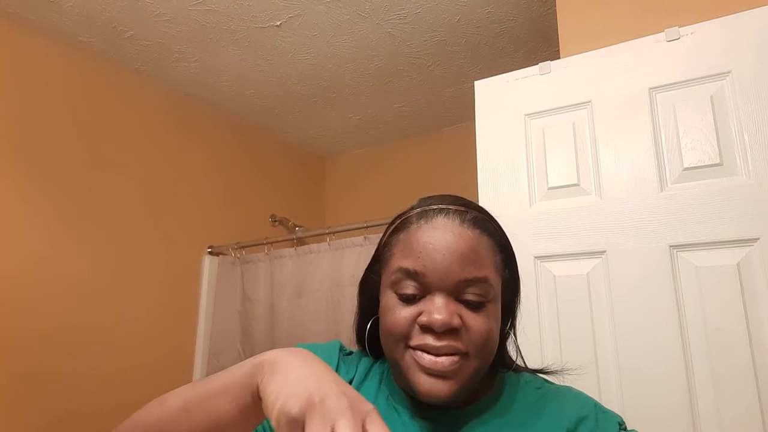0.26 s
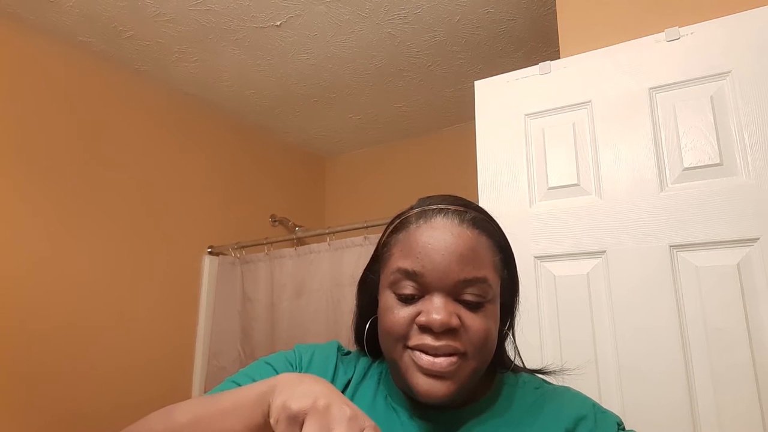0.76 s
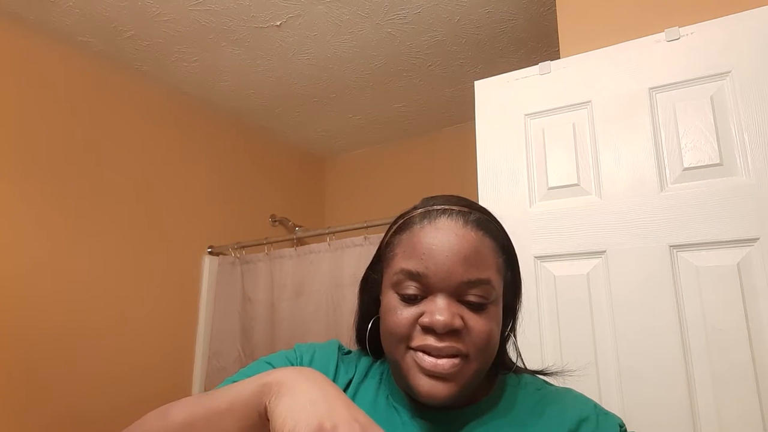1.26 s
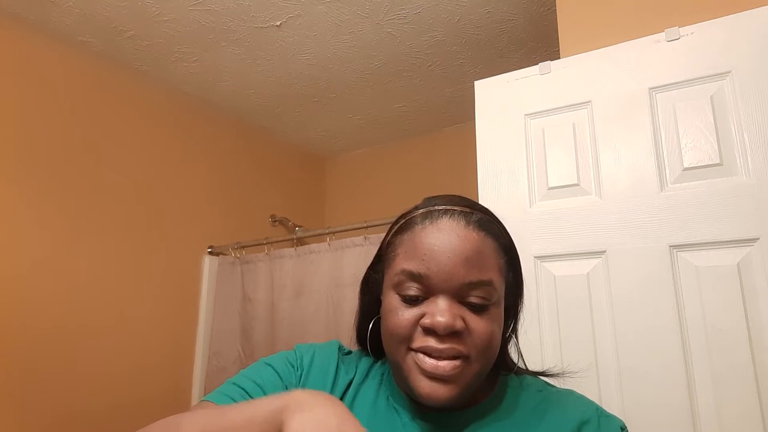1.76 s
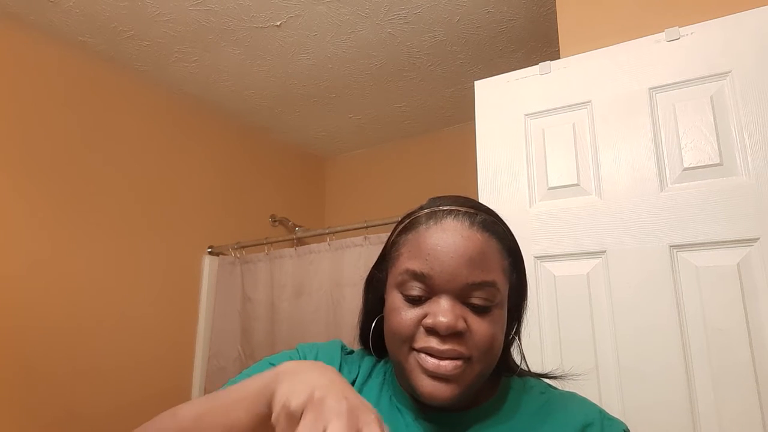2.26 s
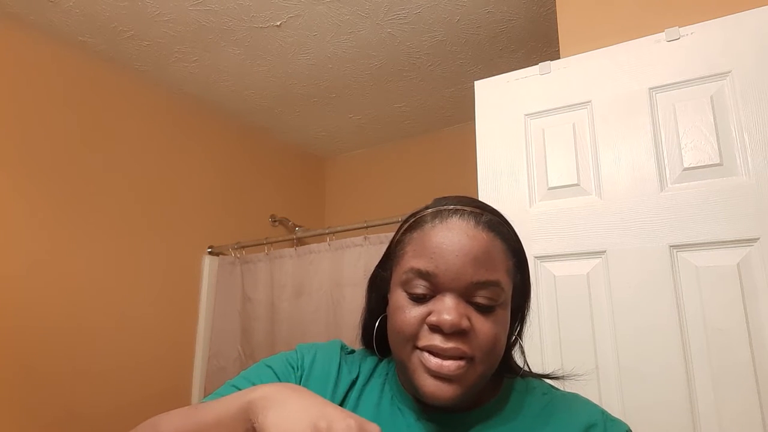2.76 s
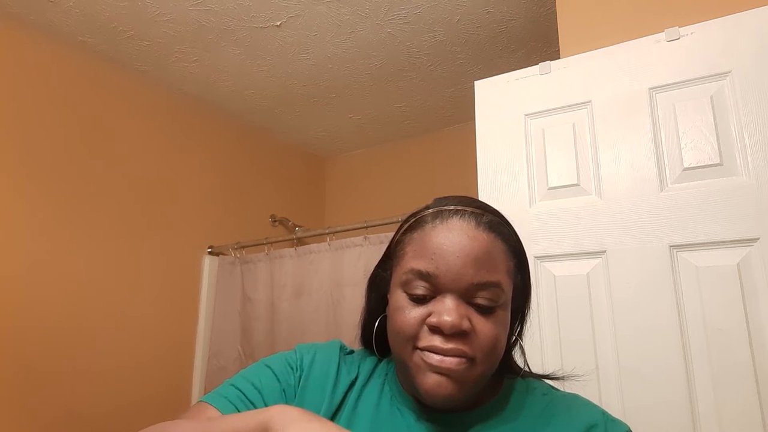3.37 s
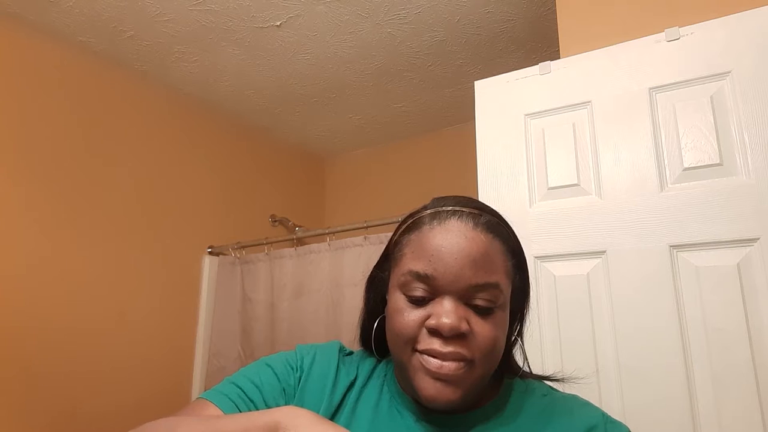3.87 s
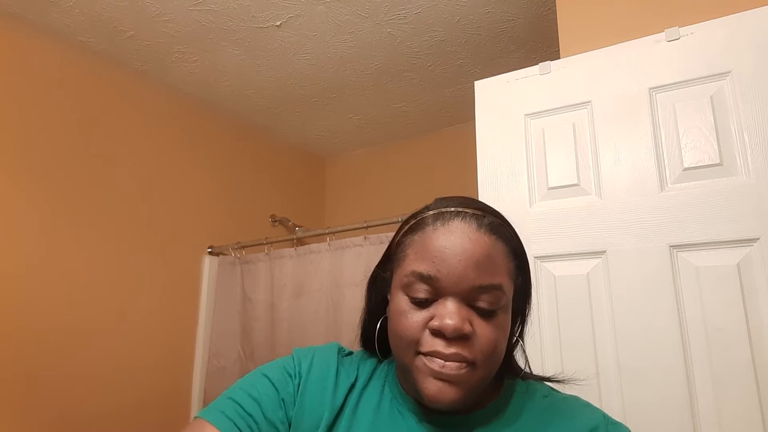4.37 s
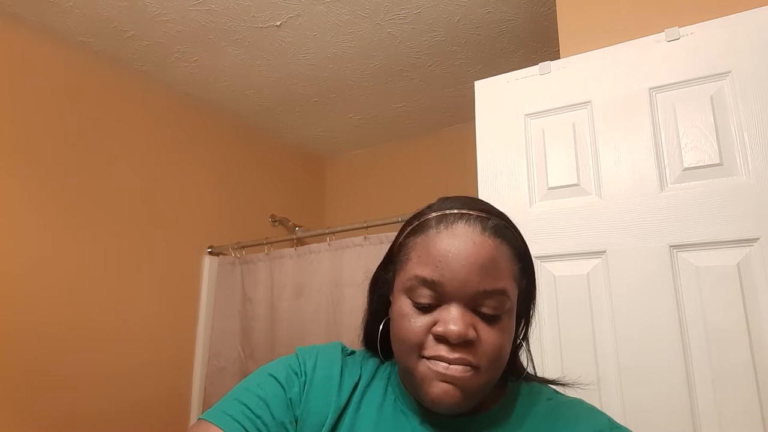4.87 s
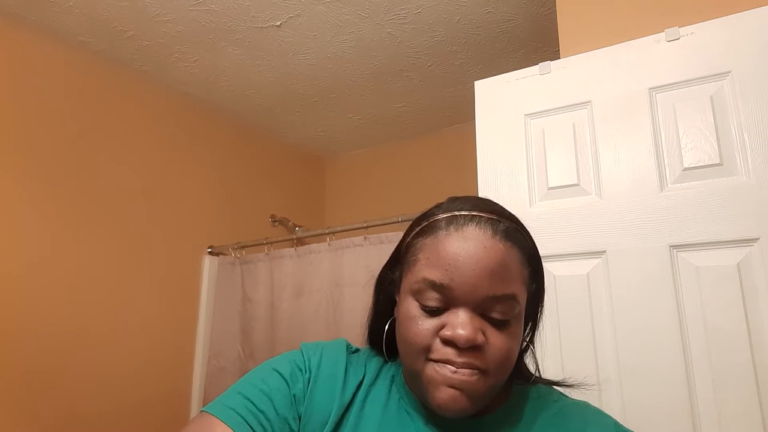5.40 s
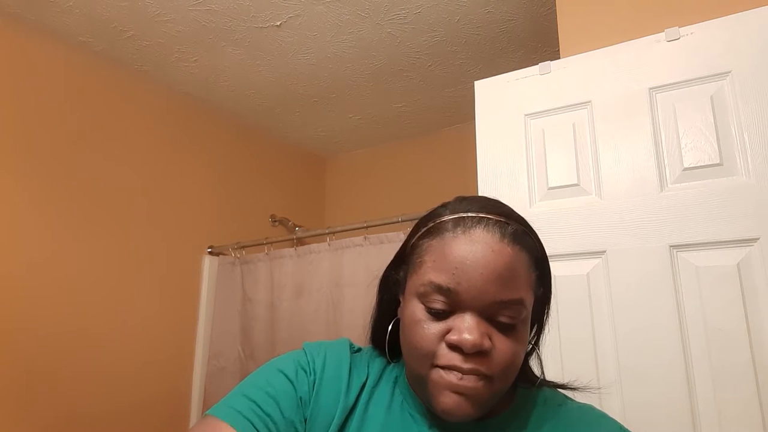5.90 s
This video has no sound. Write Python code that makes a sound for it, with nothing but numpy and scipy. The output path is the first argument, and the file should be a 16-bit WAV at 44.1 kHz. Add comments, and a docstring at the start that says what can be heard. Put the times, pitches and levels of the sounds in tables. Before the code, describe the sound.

A tight metal lid clicks and scrapes on a glass jar in a small bathroom, then the jar knocks down on the counter.

```python
"""A tight metal lid is twisted and forced on a glass jar in a small tiled bathroom.
The thread slips in clicks and short scrapes that ring the lid, fingers rub on it, and at last the
jar knocks down on the counter. Hard walls ring for about a third of a second over a bed of air,
rumble and wavering low hum, all heard close up by a phone with two microphone ports."""
import sys
import numpy as np
from scipy import signal
from scipy.fft import rfft, irfft, next_fast_len
from scipy.io import wavfile

SR = 44100
rng = np.random.default_rng(int(sys.argv[2]) if len(sys.argv) > 2 else 0)


def master_out(mix):
    """Clip the mix to full scale and print it as 16-bit PCM to the path in sys.argv[1]."""
    frames = np.transpose(np.atleast_2d(mix))
    ceiling = np.clip(frames, -1, 1)
    pcm = np.round(ceiling * 32767).astype(np.int16)
    wavfile.write(sys.argv[1], SR, pcm)


N = 270774

# Thread clicks; depth adds drive mostly to the body, twist to skirt and rim:
# start_s, edge_level_db, depth_db, twist_db
SLIPS = [(.007, -26, -25, 7), (0.0365, -10, -20, 2.5), (0.0931, -16.5, -16.5, -1.5), (.178, -30.5, -7.5, 2),
         (0.297, -65, -27, 4), (0.3621, -46, -16.5, -16), (0.6783, -44, -12, -5), (.765, -43.5, -14.5, -4),
         (0.9148, -29.5, -13, 1), (0.925, -13.5, -21.5, 0), (0.9335, 3, -25.5, -3.5),
         (0.9803, -9.5, -25, 0), (1.0678, -32, -20, 3), (1.075, -14.5, -21, 1), (1.1214, -27.5, -37, 3),
         (1.1337, -52, 2.5, 22), (1.205, -34, -16.5, 2.5), (1.3028, -78.5, 29, -5),
         (1.4487, -38.5, -14.5, -5), (1.463, -27, -12.5, 1), (1.6142, -33.5, -8, -1),
         (1.7512, -20, -15, -1.5), (1.847, -65, 18, 1), (1.98, -44.5, -12, -5), (2.0509, -26, -15, -1.5),
         (2.3675, -53, -22, -13), (2.4734, -45.5, -13, -5.5), (2.7189, -43.5, -1.5, 2),
         (3.1011, -33.5, -6.5, 3.5), (3.2266, -40.5, -9, -14), (3.4643, -26.5, -8, -3.5),
         (4.1067, -41, -8, -2.5), (4.139, -47, 22.5, -11), (4.1773, -21, -4, -19), (4.2026, -11.5, -7.5, 5),
         (4.248, -8, -7.5, 3), (4.285, -11, -13.5, 4), (4.4507, -29, -12, 6), (4.478, -52, 6, -6),
         (4.5344, -35.5, -19, 7), (4.6147, -13.5, -7.5, 7), (4.772, -46, 3.5, 0), (4.7923, -24, 0.5, 6),
         (4.875, -60, 27.5, -8), (5.1268, -43.5, 17, 0), (6.0334, -55.5, 9.5, 3.5)]
# Forced scrapes: start_s, hold_s, edge_level_db, depth_db
SCRAPES = [(.036, 0.02, -39.5, -18.5), (.936, 0.054, -35.5, -23), (1.07, 0.012, -48, -18),
           (1.125, 0.0083, -54.5, -16.5), (4.135, .03, -62.5, 6), (4.17, 0.033, -43.5, -9.5),
           (4.204, 0.037, -33.5, -13.5), (4.284, 0.0058, -36, -10), (5.108, 0.0069, -80.5, 27)]
# Finger rubs: start_s, hold_s, edge_level_db, depth_db
RUBS = [(.33, 0.3, -78.5, -24.5), (.6, 0.067, -75.5, -10), (.82, 0.068, -81, -28.5), (1.27, 0.89, -86, -9),
        (1.85, 0.23, -70.5, -12), (2.2, 0.56, -87, -16.5), (3.25, .18, -86, -16), (4.42, 0.33, -69.5, -11)]
# Ring of lid and jar: pitch_hz, level_db, t60_s
LID_MODES = [(628, -14.5, 0.053), (1434, -4, 0.055), (1492, -3.5, 0.33), (1932, -1.5, 0.044),
             (2190, -3, .025), (3056, -13.5, 0.2), (3290, -10, 0.0054), (3886, -4.5, 0.03),
             (4699, -22.5, 0.1033), (5854, -2, 0.045), (6870, -16.5, 0.019), (8450, -5, 0.015),
             (8060, -8, 0.055), (9650, -0.5, 0.032), (10600, -8.5, 0.09), (11300, -6, 0.04),
             (12150, 0.5, 0.035), (13310, -24, .05)]
# The lid's four parts, body, skirt, rim and edge: low_hz, high_hz
PARTS = [(1100, 2500), (2500, 4700), (4700, 7300), (7300, 15800)]
# Share of the depth that each part gets: body, skirt, rim, edge
DEPTH_SHARE = [0.98, 0.51, 0.19, 0]
# Share of the twist that each part gets: body, skirt, rim, edge
TWIST_SHARE = [0.061, 0.94, 1, 0]
# Trims for each gesture, the dry crack and the ring: body_db, skirt_db, rim_db, edge_db
SLIP_DB, SCRAPE_DB, RUB_DB = [-1, -5, -9, 0], [-2.5, -1, -6.5, 1], [-2.5, -5.5, -18, 3.5]
CRACK_DB, SING_DB, SCRAPE_SING_DB = [-4.5, -5, -12, -6.5], [-23, -19, -29, -30], [13, 13.4, 18, 16]
# Send from the rubs into the ring: body_db, skirt_db, rim_db, edge_db
RUB_SING_DB = [12, 1.5, 1, -1]
# Low thud and fluttering ring near 1 kHz after the knock: pitch_hz, level_db, t60_s
KNOCK_MODES = [(135, -5.5, 0.093), (282, -16, 0.31), (320, -9.5, 0.21), (885, -4, 0.033), (967, 9.5, 0.12),
               (1008, 10, 0.2), (1077, 5.5, 0.29), (1130, 1, 0.15), (1505, -9.5, 0.013), (1887, 7.5, 0.031),
               (2243, 6, 0.017)]
# Tone of the jar's impact: frequency_hz, gain_db
IMPACT_EQ = [(59, -53), (100, -31.5), (335, -1.5), (721, -8.5), (1100, -3.5), (1360, -7.5), (6150, -28),
             (16000, -31)]
# Tone of the air: frequency_hz, gain_db
AIR_EQ = [(60, -10), (110, 2.5), (200, -16.5), (350, -8.5), (550, -19), (800, -26.5), (2000, -30),
          (4000, -40), (8000, -43), (10500, -28.5), (12300, -34.5), (13000, -57)]
# Room resonances in the air: pitch_hz, width_hz, level_db
AIR_PEAKS = [(230, 12, -90.5), (326.4, 28, -86), (418.7, 12, -82.5), (474.4, 7.8, -87)]
# Swells of the low bed: time_s, hum_db, rumble_db
LOW_SWELLS = [(0.0, -63, -65), (0.24, -55, -64.5), (0.46, -76, -70.5), (0.91, -57, -68.5),
              (0.96, -66.5, -62), (1.85, -75, -77.5), (2.53, -70.5, -63), (2.97, -70, -70),
              (3.5, -66.5, -68.5), (3.73, -51, -60), (3.97, -67.5, -74.5), (4.29, -46.5, -57),
              (4.55, -73, -73), (4.69, -50, -63), (5.01, -69.5, -66), (5.58, -68.5, -80.5),
              (5.64, -62.5, -53), (6.14, -73.5, -79.5)]
# Quiet moments where a fresh room tail starts: start_s
TAIL_CHANGES_S = [0, .7, 1.4, 1.72, 2.02, 2.6, 3.05, 3.4, 4.0, 4.58, 4.77, 5.08, 5.5]
# Tail of the tiled room: frequency_hz, t60_s, level_db
REVERB = [(100, 0.4, -25.5), (1050, 0.38, -24), (2440, 0.35, -24.5), (6000, 0.35, -24),
          (14340, 0.28, -23.5)]
# How alike the two ports hear the room: frequency_hz, correlation
PORT_LIKENESS = [(60, .96), (150, .99), (300, .985), (600, .75), (1200, .15), (3000, 0)]
# Lean between the ports: frequency_hz, left_minus_right_db
PORT_BALANCE = [(60, -5), (250, 3.8), (1000, 1.5), (2000, 2.5), (4000, -3.5), (8000, -4.5), (12000, 5)]
# Tone of the microphone: frequency_hz, gain_db
MIC_EQ = [(500, -1), (6300, 6), (7300, 4.5), (8300, 1), (15000, -4.5)]


def amp(db):
    """dB to gain."""
    return 10 ** (np.asarray(db, float) / 20)


def unit(x):
    """Scale to rms 1."""
    return x / np.sqrt(np.mean(x ** 2))


def across(table, n):
    """A (Hz, value) curve at every bin of an n-point transform."""
    hz, value = np.transpose(table)
    return np.interp(np.log(np.arange(n // 2 + 1) * SR / n + 1), np.log(hz), value)


def colour(x, gain):
    """EQ by gain(n), one gain for each bin of an n-point transform."""
    n = next_fast_len(x.shape[-1], real=True)
    return irfft(rfft(x, n) * gain(n), n)[..., :x.shape[-1]]


def band(x, lo_hz, hi_hz, order=2):
    """Band-pass."""
    return signal.sosfilt(signal.butter(order, [lo_hz, hi_hz], "bandpass", fs=SR, output="sos"), x)


def ring(x, modes):
    """Damped modes driven by x, in alternating polarity; each level sets a mode's energy."""
    out = np.zeros(len(x))
    for k, (hz, db, t60) in enumerate(modes):
        r = np.exp(-np.log(1000) / (max(t60, .005) * SR))
        w = 2 * np.pi * hz / SR
        gain = (-1) ** k * amp(db) * 2 * np.sqrt(1 - r) * np.sin(w)
        out += gain * signal.lfilter([1], [1, -2 * r * np.cos(w), r * r], x)
    return out


def stereo_noise(n):
    """Noise that is centred in the bass and wide in the treble."""
    mid = colour(rng.standard_normal(n), lambda m: np.sqrt((1 + across(PORT_LIKENESS, m)) / 2))
    side = colour(rng.standard_normal(n), lambda m: np.sqrt((1 - across(PORT_LIKENESS, m)) / 2))
    return np.array([mid + side, mid - side])


def room_tone():
    """The bed: soft air with a few room resonances, a wavering hum and a swelling rumble."""
    air = amp(-72.5) * unit(colour(stereo_noise(N), lambda n: amp(across(AIR_EQ, n))))
    for hz, width, db in AIR_PEAKS:
        air += amp(db) * unit(band(rng.standard_normal(N), hz - width / 2, hz + width / 2))
    time_s, hum_db, rumble_db = np.transpose(LOW_SWELLS)
    t = np.arange(N) / SR
    hum_hz = 60.2 + 2.7 * unit(band(rng.standard_normal(N), 0.32, 3.8))
    hum = np.sqrt(2) * np.sin(2 * np.pi * np.cumsum(hum_hz) / SR) * amp(np.interp(t, time_s, hum_db))
    rumble = unit(band(stereo_noise(N), 62, 125)) * amp(np.interp(t, time_s, rumble_db))
    return air + rumble + hum


def grit(spread_db):
    """Stick-slip texture: dense grains of very uneven size, 24 samples each."""
    size = amp(spread_db * np.repeat(rng.exponential(size=N // 24 + 1), 24)[:N])
    return unit(size * rng.standard_normal(N))


def slips(part, texture):
    """The thread lets go: each slip kicks one part of the lid with a tiny burst of grit."""
    t = np.arange(2048) / SR
    rise_s, decay_s = .00058, .001358
    fade = np.exp(-t / decay_s) * (1 - np.exp(-t / rise_s))
    chatter, force = unit(band(texture, *PARTS[part])), np.zeros(N)
    for start_s, db, depth_db, twist_db in SLIPS:
        i = int(start_s * SR)
        burst = fade * chatter[i:i + len(t)]
        gain = amp(db + DEPTH_SHARE[part] * depth_db + TWIST_SHARE[part] * twist_db + SLIP_DB[part])
        force[i:i + len(t)] += gain * burst * np.linalg.norm(fade) / np.linalg.norm(burst)
    return force


def friction(strokes, part, texture, attack_s, fall_db_per_s):
    """Scrapes or rubs drag on one part of the lid: grit that rises, holds and falls away."""
    envelope, t = np.zeros(N), np.arange(N) / SR
    for start_s, hold_s, db, depth_db in strokes:
        rise = np.clip((t - start_s) / attack_s, 0, 1)
        fall_db = fall_db_per_s * np.clip(t - start_s - hold_s, 0, .5)
        envelope += rise * amp(db + DEPTH_SHARE[part] * depth_db - fall_db)
    lo, hi = PARTS[part]
    makeup = np.sqrt(SR / 2 / (hi - lo))  # for the part's limited bandwidth
    return makeup * envelope * texture


def lid_ring(part, drive):
    """One part's modes sing; once the lid is off, the hand makes the body ring shorter and lower."""
    lo, hi = PARTS[part]
    modes = [mode for mode in LID_MODES if (lo if part else 0) <= mode[0] < hi]
    if part > 0:
        return ring(drive, modes)
    lid_off = np.arange(N) / SR > 4.58
    muffled = [(hz * .94, db, min(t60, .14)) for hz, db, t60 in modes]
    return ring(drive * ~lid_off, modes) + ring(drive * lid_off, muffled)


def lid():
    """Slips, scrapes and finger rubs play the lid's four parts: a broad crack plus a metal ring."""
    out = np.zeros(N)
    rough, fine = grit(spread_db=3.5), grit(spread_db=-7.0)
    for part, (lo, hi) in enumerate(PARTS):
        slip = slips(part, fine)
        scrape = amp(SCRAPE_DB[part]) * friction(SCRAPES, part, rough, attack_s=.0024, fall_db_per_s=799.5)
        rub = amp(RUB_DB[part]) * friction(RUBS, part, rough, attack_s=.082, fall_db_per_s=300)
        out += amp(CRACK_DB[part]) * band(slip + scrape + rub, lo, hi, order=3)
        # a steady scrape makes the modes sing more than a slip does
        drive = slip + amp(SCRAPE_SING_DB[part]) * scrape + amp(RUB_SING_DB[part]) * rub
        out += amp(SING_DB[part]) * lid_ring(part, drive)
        if part == 0:
            out += amp(-12) * band(np.abs(slip + scrape), 290, 1400)  # the body thumps the held glass
            out += amp(-3) * band(scrape, 1950, 2850)  # hollow air between lid and glass
    return out


def knock(start_s=5.634):
    """The jar lands on the counter: a quick crack, a low thud and a fluttering ring near 1 kHz."""
    t = np.arange(16384) / SR
    noise = unit(colour(rng.standard_normal(len(t)), lambda n: amp(across(IMPACT_EQ, n))))
    crack = noise * np.exp(-t / 0.012)
    thud_and_ring = amp(11) * ring(1. * (t == 0), KNOCK_MODES)
    out, i = np.zeros(N), int(start_s * SR)
    out[i:i + len(t)] = amp(-14.5) * (crack + thud_and_ring)
    return band(out, 105, 15500, order=3)


def room_response(n):
    """Direct sound at both ports, then a dense tail off the tiles that dies faster in the treble."""
    t, noise, tail = np.arange(n) / SR, stereo_noise(n), 0
    hz, t60_s, db = np.transpose(REVERB)
    edges_hz = 60 * 2. ** np.arange(10)
    early_lift = 1 + .9 * np.exp(-t / .02)  # near surfaces answer first and louder
    for lo, hi in zip(edges_hz[:-1], edges_hz[1:]):
        log_centre, hi = np.log(lo * hi) / 2, min(hi, .45 * SR)
        fade = np.exp(-np.log(1000) * t / np.interp(log_centre, np.log(hz), t60_s)) * early_lift
        octave = fade * band(noise, lo, hi)
        octave /= np.linalg.norm(octave, axis=1, keepdims=True)
        weight = np.linalg.norm(fade) * np.sqrt(2 * (hi - lo) / SR)
        tail += amp(np.interp(log_centre, np.log(hz), db)) * weight * octave
    tail *= np.clip(t / 0.00059, 0, 1)
    # the jar is below the phone: half hidden in the bass, while the treble beams up
    impulse = 1. * (t == 0)
    direct = amp(-4.5) * impulse + amp(-5.5) * band(impulse, 6000, 21000)
    return tail + [direct, np.roll(direct, 4)]  # the right port is a little further off


def bathroom(x):
    """Tiled reverb with a fresh tail for each stretch, so the clicks' echoes vary."""
    n = 24576
    out, cuts = np.zeros((2, N + n)), [int(s * SR) for s in TAIL_CHANGES_S] + [N]
    for a, b in zip(cuts[:-1], cuts[1:]):
        out[:, a:b + n - 1] += signal.fftconvolve(x[None, a:b], room_response(n), axes=1)
    return out[:, :N]


def scene():
    """Lid and knock in the bathroom, over the room tone."""
    return bathroom(lid() + knock()) + room_tone()


def record(dry):
    """The phone gives each port its own colour and cuts the top at 16 kHz."""
    wet = colour(dry, lambda n: amp(np.outer([.5, -.5], across(PORT_BALANCE, n)) + across(MIC_EQ, n)))
    return signal.sosfilt(signal.ellip(8, .2, 70, 16000, fs=SR, output="sos"), wet)


dry = scene()
out = record(dry)
master_out(out)
```